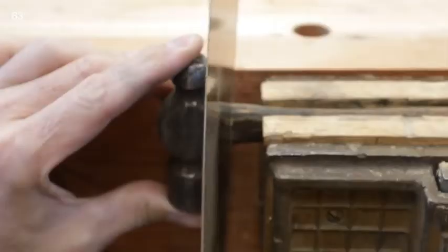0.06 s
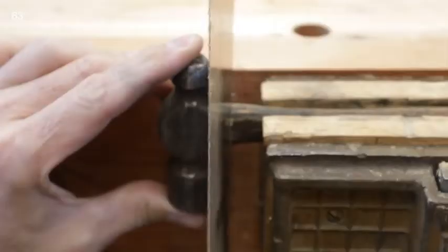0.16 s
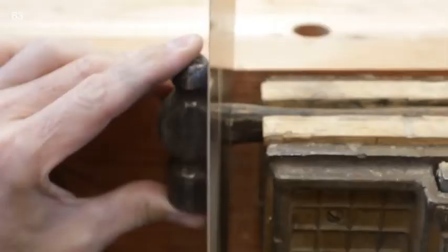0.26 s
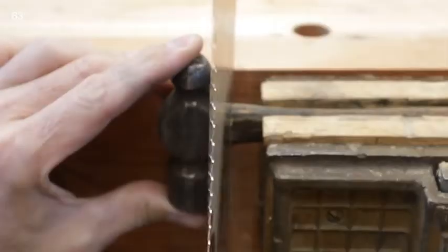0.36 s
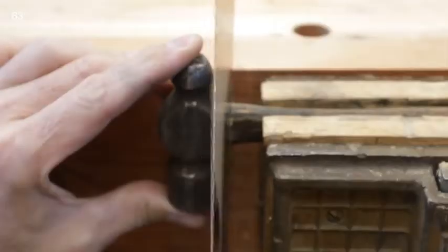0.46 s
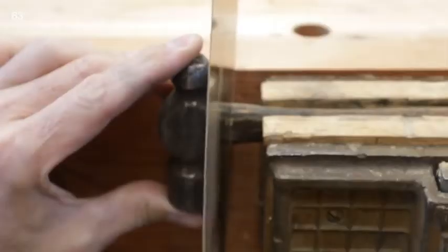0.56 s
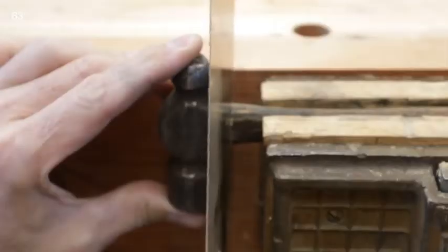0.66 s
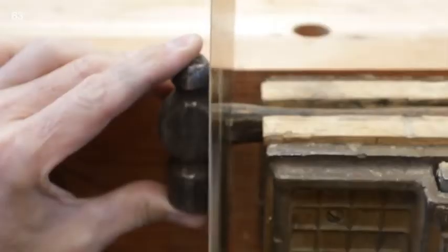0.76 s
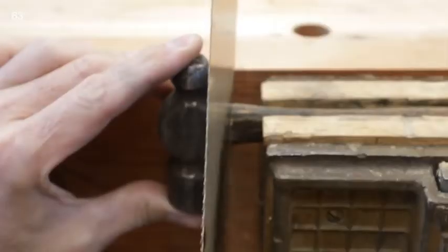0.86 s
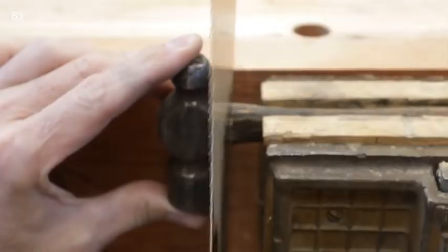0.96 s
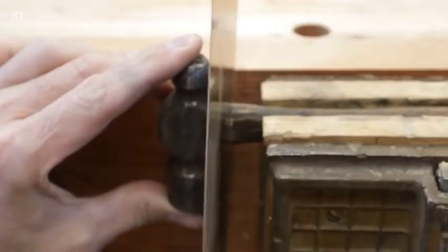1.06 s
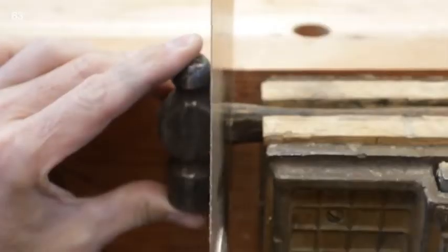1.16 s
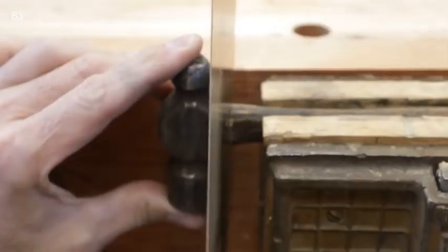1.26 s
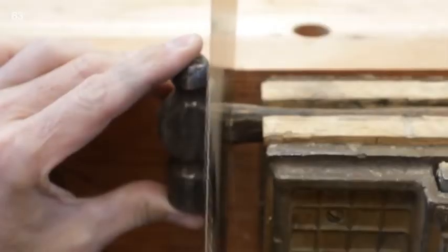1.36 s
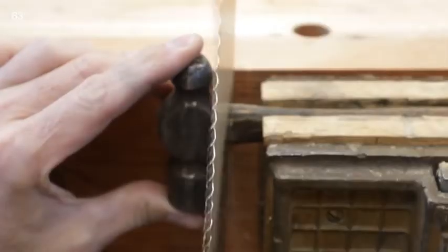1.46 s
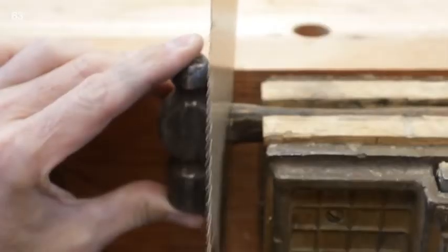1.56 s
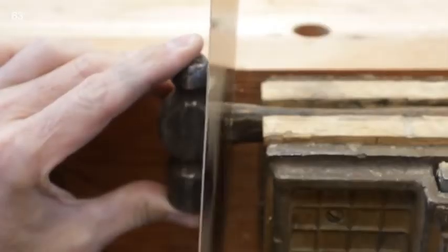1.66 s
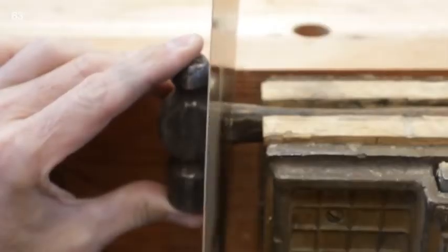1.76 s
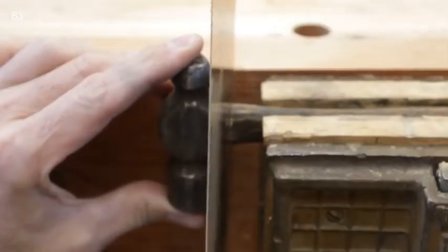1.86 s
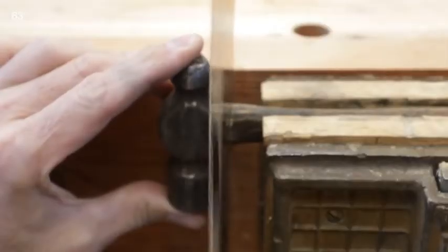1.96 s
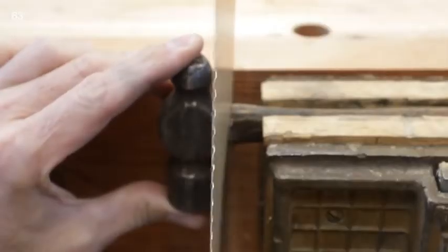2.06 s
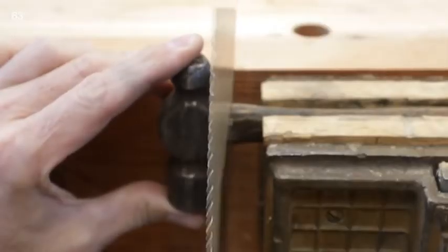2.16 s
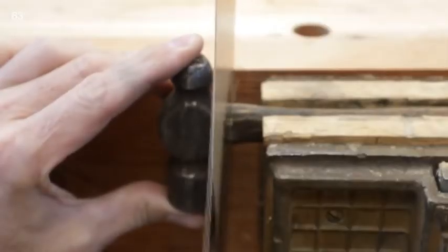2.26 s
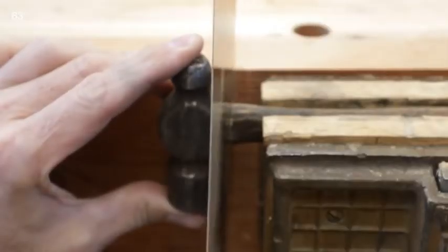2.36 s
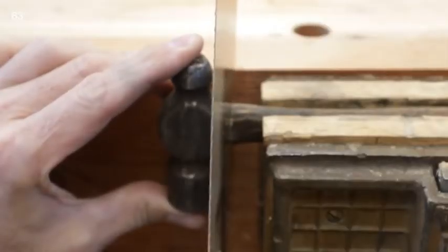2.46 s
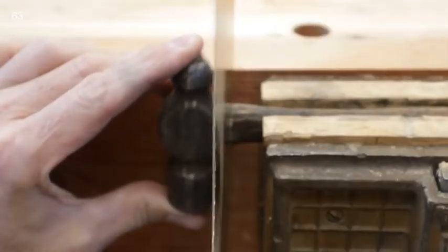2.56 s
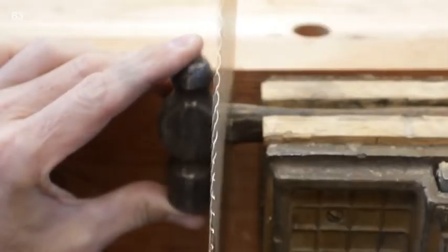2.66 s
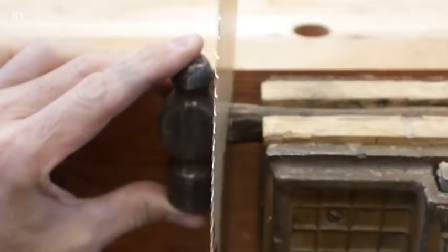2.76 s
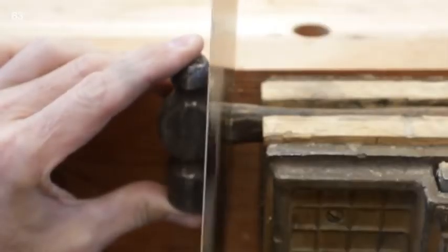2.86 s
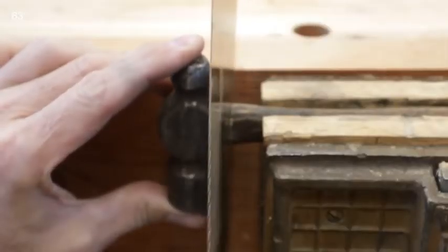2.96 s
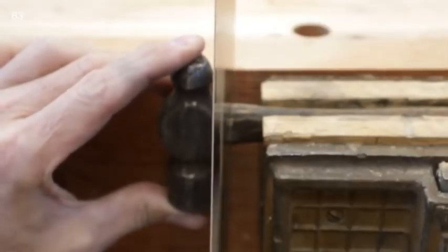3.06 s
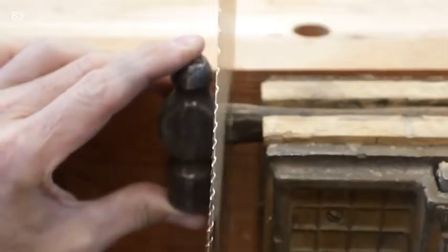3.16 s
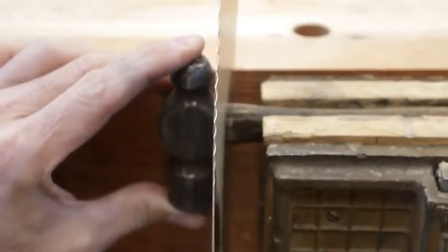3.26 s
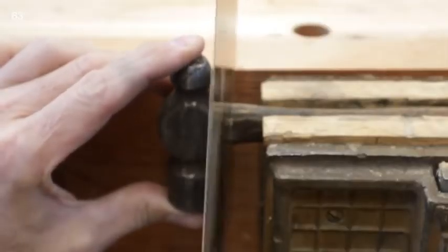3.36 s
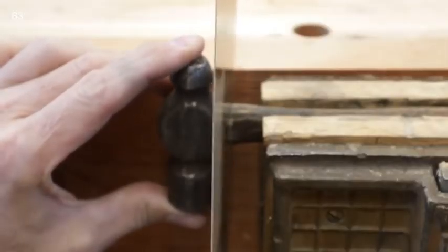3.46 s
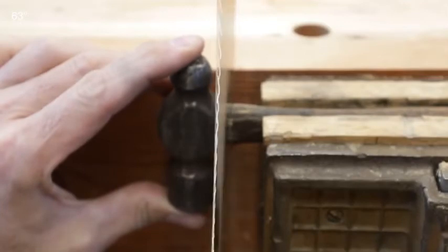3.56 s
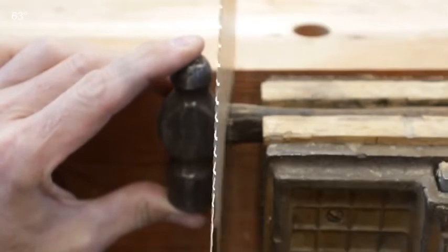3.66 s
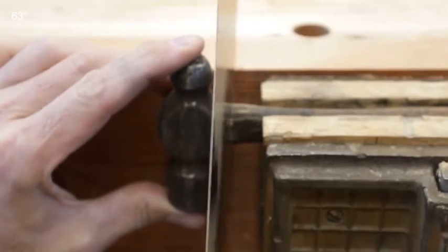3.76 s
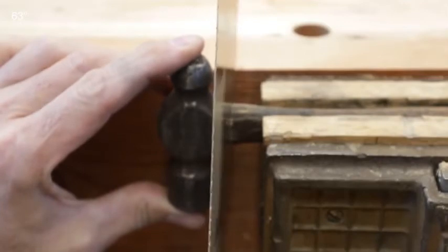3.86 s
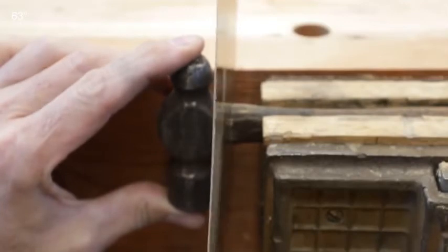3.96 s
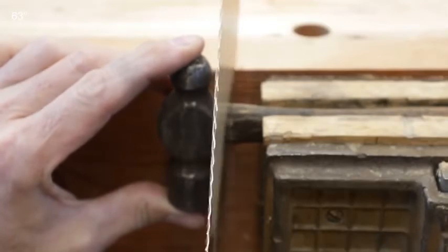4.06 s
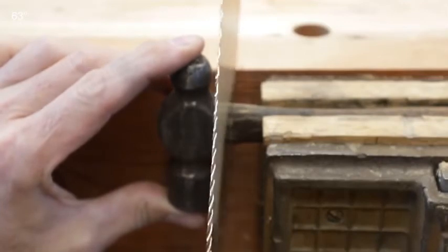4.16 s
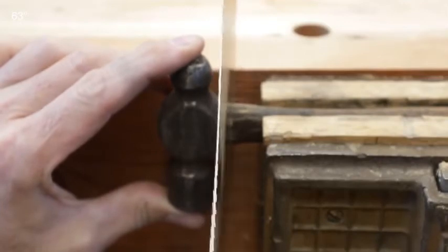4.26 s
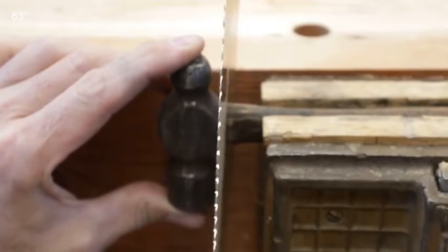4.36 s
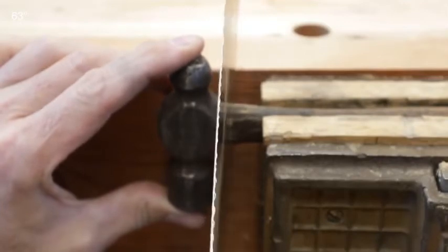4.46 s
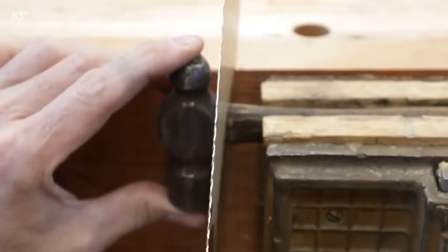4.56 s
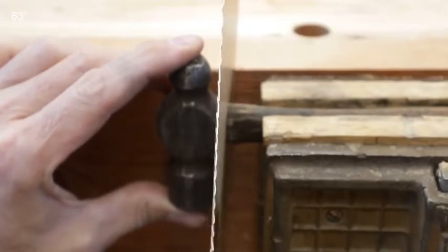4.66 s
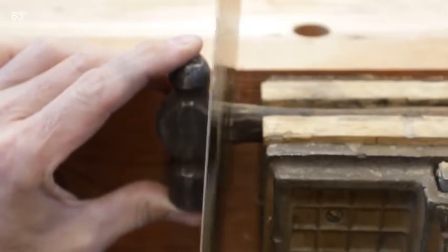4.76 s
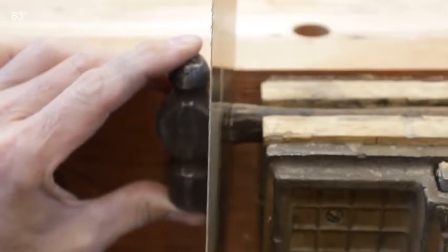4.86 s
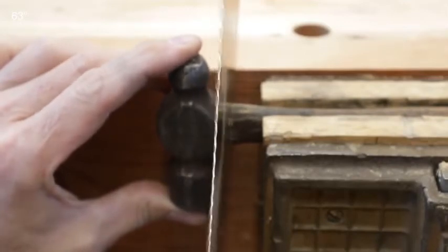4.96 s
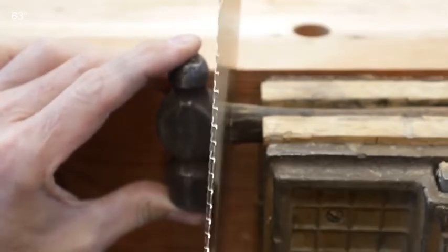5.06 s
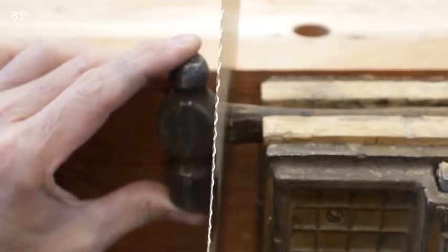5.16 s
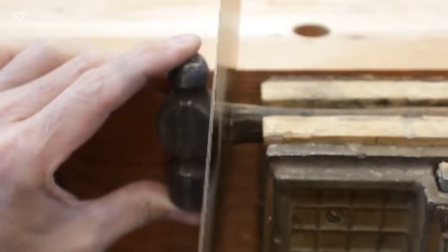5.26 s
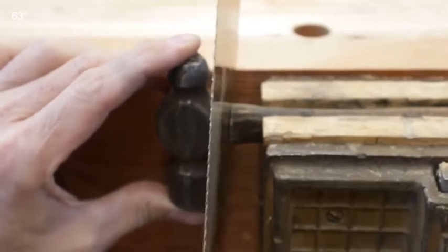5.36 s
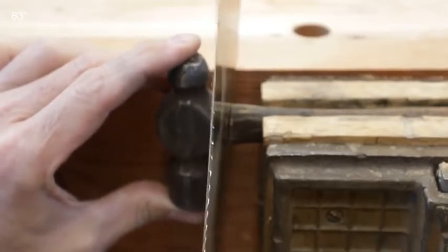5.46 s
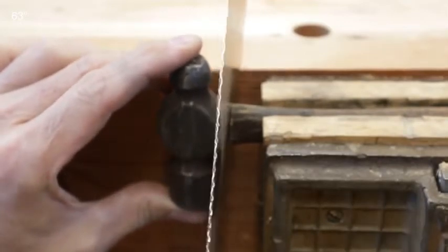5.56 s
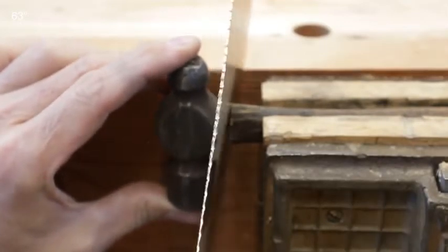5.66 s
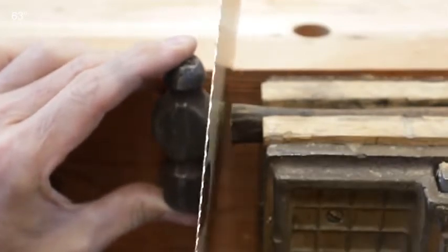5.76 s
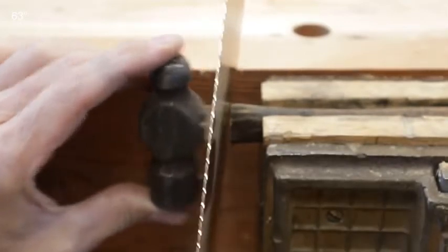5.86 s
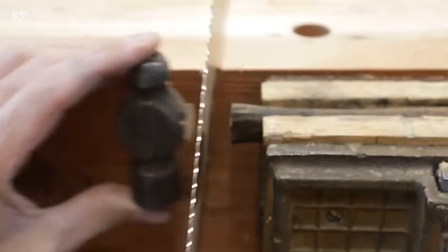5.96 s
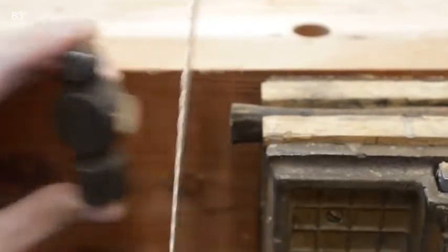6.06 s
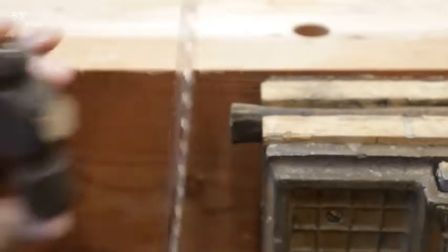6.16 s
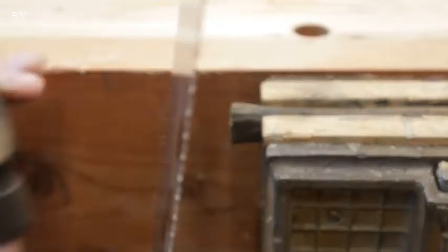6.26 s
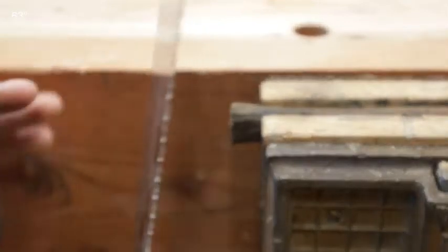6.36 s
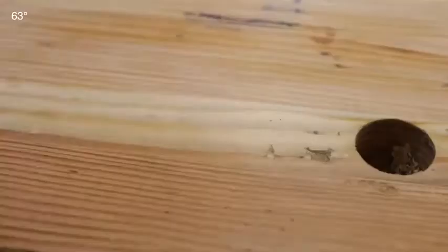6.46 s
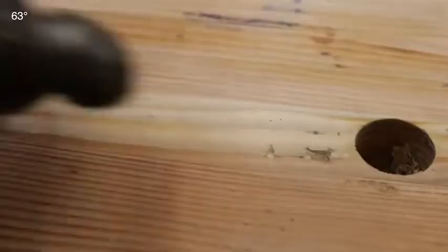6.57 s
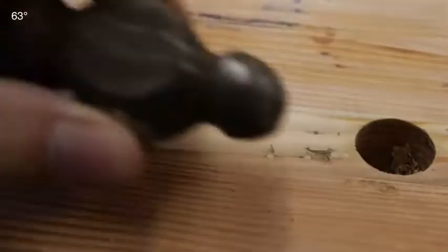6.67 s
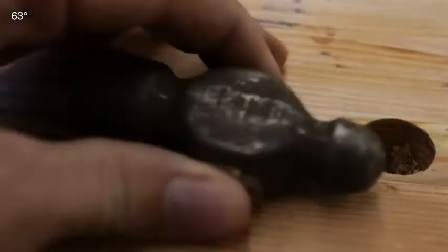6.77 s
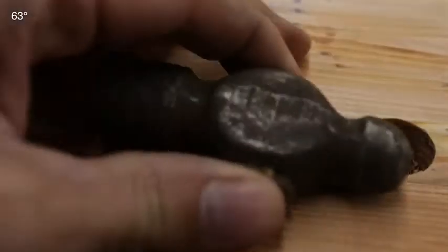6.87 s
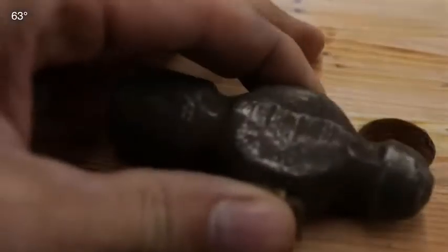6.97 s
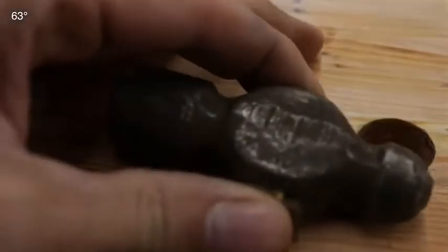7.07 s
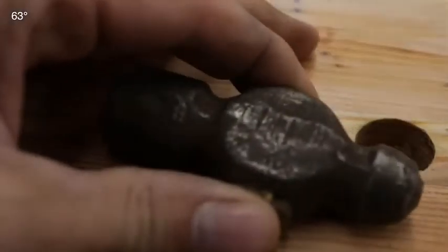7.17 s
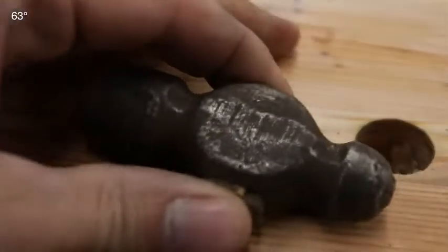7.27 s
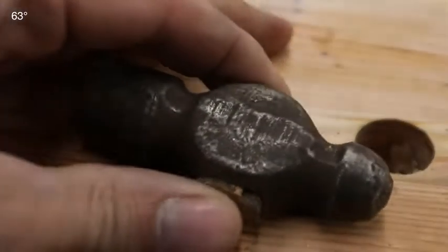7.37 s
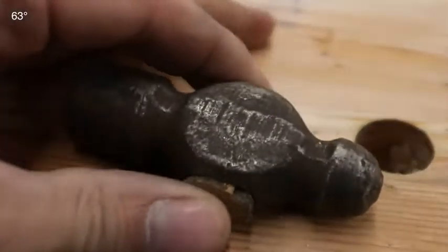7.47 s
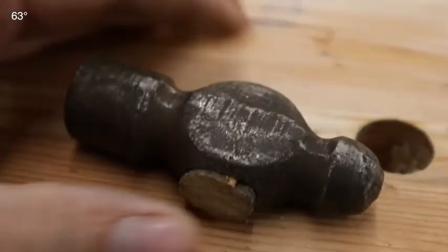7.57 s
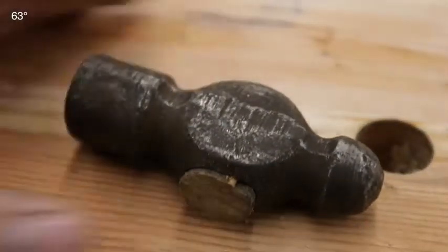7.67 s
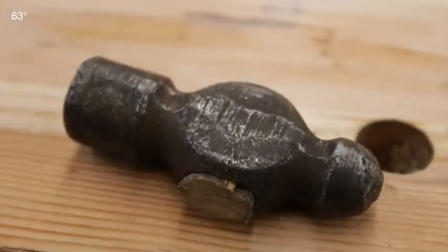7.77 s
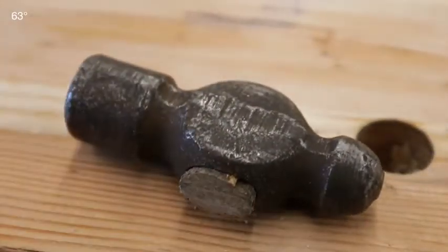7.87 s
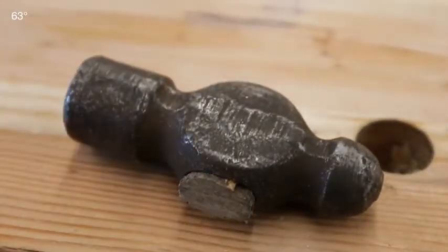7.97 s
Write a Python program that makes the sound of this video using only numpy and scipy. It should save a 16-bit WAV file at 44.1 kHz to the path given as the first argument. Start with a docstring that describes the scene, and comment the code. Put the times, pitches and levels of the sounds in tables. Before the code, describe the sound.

A handsaw rasps through a wooden handle in quick alternating strokes, breaks free with a faint steely ring, then a metal head knocks onto a bench.

```python
"""Handsaw through a wooden handle

A handsaw cuts a wooden handle held in a bench vice, with loud push and softer pull strokes. Tearing fibres, a
random impulse train, excite the blade, the thinning handle and the vice as resonators. The blade rings out when
it breaks through. Then, quieter, the steel head is set down on the bench top, exciting its many modes, and the
hand slides off it with a rustle of filtered grains."""
import sys
import numpy as np
from scipy import signal
from scipy.fft import rfft, irfft
from scipy.io import wavfile
from scipy.ndimage import uniform_filter1d

SR = 44100
rng = np.random.default_rng(int(sys.argv[2]) if len(sys.argv) > 2 else 0)


def int16_out(signal):
    """Quantize to a 16-bit WAV file."""
    q = np.round(np.clip(np.atleast_2d(signal).T, -1, 1) * 32767)
    wavfile.write(sys.argv[1], SR, q.astype(np.int16))


def gain_from_db(level_db):
    """Turn a decibel level (scalar or array-like) into a linear amplitude factor."""
    decades = np.asarray(level_db, float) / 20
    return 10 ** decades


N = 353241

# strokes, push and pull in turn, each ending where the next starts: (start [s], rasp level [dB],
# share of the stroke at top speed [0-1], handle re rasp [dB], vice re rasp [dB])
STROKES = [(-0.18, -37.5, 0.55, 4, 8), (0.061, -42.5, 0.42, 0.6, 1.5), (0.289, -37.5, 0.55, 3, -2.5),
           (0.537, -41, 0.38, 1.2, 1), (0.79, -37, 0.43, 4, -3), (1.054, -38.5, .45, -2.2, 0.5),
           (1.317, -38.5, 0.48, 3.5, 3), (1.685, -40, 0.39, -1.9, -3.5), (1.956, -36.5, 0.56, 5, 1.5),
           (2.273, -40.5, 0.53, 2, 0.3), (2.576, -37, 0.49, 2.4, 0.9), (2.878, -43, 0.38, 0, -8),
           (3.127, -38, 0.56, 4, -1), (3.349, -43, 0.44, 2.5, 1), (3.576, -35.5, .55, 4.5, -3.5),
           (3.798, -42.5, 0.42, 3, -0.7), (4.036, -40, .52, 9, 4), (4.277, -44.5, 0.48, 5.5, 0),
           (4.512, -40, 0.58, 8, 5), (4.754, -43.5, 0.44, 1, -3), (4.987, -43.5, 0.5, 4.5, 3),
           (5.276, -44, 0.5, 0, 3), (5.51, -40, 0.57, 3, -2.5), (5.725, -44.5, 0.11, 3.5, 2.2)]
# growth of the rasp as a power of speed, a row each for push and pull: (speeding up [1], slowing down [1])
SPEED_POWER = [(1.5, 1.83), (1.9, 1.53)]
# rasp at the turn re the peak of the stroke, one entry each for push and pull: (level [dB])
TURN_DB = [-19.5, -19.5]
# spectrum of the rasp: (frequency [Hz], density [dB per Hz])
RASP = [(880, -36), (1500, 1.5), (1850, -18), (1990, 3), (2260, -1.5), (2800, 2.5), (3230, 3.5),
        (4640, -10.5), (5660, -4), (6710, -14), (11600, -17.5), (13500, -18.5), (14500, -41)]
# relative loudness of the blade modes in the cut: (frequency [Hz], level [dB])
KERF = [(1410, -30.5), (2400, 2.5), (3320, -1), (5900, -8.5), (6890, -10.5), (14000, -14.5)]
# modes of the free blade: (frequency [Hz], relative level [dB], ring time T60 [s])
BLADE = [(624, -8, .7), (834, -20, 1.2), (1001, -24, 1.3), (1249, -10, .8), (1712, -15, .9),
         (1825, -23, .78), (2466, -22, .5), (2552, -6, .3), (2837, -24, 2.0), (3095, -2, .6),
         (3348, -11, 1.0), (3580, -12, .6), (4021, -20, 1.6), (4511, -18, 1.1), (4893, -19, .4),
         (5055, -23, .73), (5200, -13, .35), (5512, -27, .93), (5798, -9, .8), (6702, -23, .54),
         (7031, -34, 1.5), (7817, -17, .55), (8538, -19, .63), (8893, -24, .77), (9227, -25, .71),
         (10360, -25, .41), (10510, -27, .47)]
# resonance of the thinning handle at mid stroke: (time [s], frequency [Hz])
NECK = [(0.0, 1080), (0.5, 1280), (1.2, 1110), (2.2, 1170), (3.3, 1170), (4.3, 1114), (5.1, 1032),
        (5.4, 980), (5.6, 844), (5.86, 840)]
# rings of the handle and jaws: (frequency [Hz], relative level [dB])
WOOD = [(1087, -51), (1297, -49), (1475, -56), (1615, -55), (1744, -56), (1981, -57), (2363, -61)]
# rings of the vice and bench: (frequency [Hz], relative level [dB])
VICE = [(129.2, -63), (296.1, -48.5), (446.8, -50), (506.0, -51)]
# hum of the vice on the pull: (frequency [Hz], level re rasp [dB], ring time T60 [s])
HUM_HZ, HUM_DB, HUM_T60_S = (361, -14, 0.078)
# colour of the blade on the pull: (frequency [Hz], width [Hz], level re rasp [dB])
SHEEN_HZ, SHEEN_WIDTH_HZ, SHEEN_DB = (3000, 270, -16)
# teeth that catch: (time [s], relative level [dB], frequency [Hz])
CATCHES = [(0.393, -15.5, 1760), (0.421, -28, 1500), (0.446, -19.5, 1290), (0.563, -27, 1030),
           (0.614, -28.5, 1190), (0.811, -26.5, 635), (1.136, -18, 1110), (1.381, -21.5, 620),
           (1.424, -9.5, 1970), (1.482, -11.5, 1260), (1.526, -14, 1270), (2.051, -31.5, 978),
           (2.066, -30, 1270), (2.5, -23.5, 1080), (2.631, -18.5, 800), (2.977, -20, 1330),
           (3.006, -23, 1030), (3.166, -20.5, 1120), (3.18, -20, 1085), (3.225, -17.5, 1106),
           (3.253, -13, 1090), (3.284, -23.5, 780), (3.392, -33.5, 1100), (3.605, -22, 1092),
           (3.64, -13.5, 1076), (3.692, -15, 1230), (3.958, -19.5, 1100), (4.057, -23, 974),
           (4.079, -17.5, 966), (4.1, -14, 1260), (4.123, -11.5, 1300), (4.141, -13, 1280),
           (4.163, -29, 1100), (4.189, -15.5, 1270), (4.204, -14, 1270), (4.322, -23, 993),
           (4.347, -23.5, 1070), (4.387, -18, 1040), (4.577, -16.5, 986), (4.595, -23, 1270),
           (4.621, -16, 1240), (4.651, -10, 873), (4.823, -26, 1020), (4.839, -17.5, 1266),
           (4.872, -22, 1106), (4.927, -20.5, 1066), (5.032, -20.5, 990), (5.059, -17, 1260),
           (5.077, -16.5, 1250), (5.121, -22, 1265), (5.134, -16.5, 1090), (5.163, -16.5, 910),
           (5.182, -16.5, 1180), (5.204, -16.5, 990), (5.34, -17.5, 980), (5.413, -14, 986),
           (5.441, -17, 956), (5.55, -22.5, 858), (5.583, -10.5, 853), (5.609, -16, 770),
           (5.635, -15.5, 797), (5.658, -11.5, 807), (5.73, -15.5, 813)]
# one blade mode sings out of the rasp: (time [s], level [dB], frequency [Hz], ring time T60 [s])
SINGS = [(.05, -51, 5200, .25), (.55, -46, 3095, .3), (.74, -46, 3095, .3), (1.0, -52, 9227, .3),
         (1.03, -46, 3095, .3), (1.3, -51, 5200, .2), (1.607, -38, 3095, .5), (1.72, -38, 3000, .15),
         (2.12, -38, 5512, .1), (2.197, -33, 3095, .12), (2.24, -46, 5798, .3), (3.76, -45, 4021, .3),
         (3.86, -38, 3348, .15), (3.97, -42, 3020, .25), (4.066, -36, 2956, .12), (4.62, -32, 3225, .15),
         (5.635, -34, 2837, .14), (5.67, -42, 6410, .2), (5.75, -56, 5798, .6), (5.77, -56, 4021, .5),
         (5.97, -52, 830, .15)]
# brushes of the freed blade, the first sets it ringing: (time [s], relative level [dB], top of the tick [Hz])
BRUSHES = [(5.864, -41.5, 12050), (5.961, -54.5, 9000), (6.264, -46, 5500)]
# sideways whips of the blade: (widest at [s], level [dB], frequency [Hz], 30 dB rise [s], 30 dB fall [s])
FLEX = [(0.03, -42, 60.1, 0.72, .3), (0.51, -37, 73.7, .25, .28), (0.9, -36, 72.5, 0.14, .14),
        (1.09, -45, 69, 0.07, .16), (1.41, -42.5, 65.3, 0.15, .3), (1.535, -36.5, 71.7, 0.086, .04),
        (1.65, -37, 74.6, 0.16, .27), (2.135, -29.5, 65.6, .15, .08), (2.28, -44, 75.4, 0.27, .14),
        (2.73, -27, 72.3, 0.14, .33), (3.29, -33, 71, 0.13, .27), (3.7, -35, 68.6, 0.1, .23),
        (4.225, -39.5, 67, 0.096, .08), (4.35, -54.5, 77.5, .15, .3), (4.595, -48, 71, .1, .1),
        (4.69, -39, 66.7, .08, .26), (5.1, -51.5, 82.7, 0.18, .17), (5.66, -52.5, 75.5, 0.29, .45)]
# rumbles of the bench: (strongest at [s], level [dB], 30 dB rise [s], 30 dB fall [s])
RUMBLE = [(0.03, -37.5, .25, 0.23), (0.62, -63.5, .45, .15), (0.92, -60, .22, .2), (1.07, -51, .2, .25),
          (1.49, -43.5, .28, .3), (2.13, -55.5, .35, .2), (2.34, -63, .15, 0.22), (2.8, -75, .5, .5),
          (3.33, -58.5, .4, .45), (3.7, -64.5, .4, .6), (4.22, -47, .28, .3), (4.66, -49, .25, 0.53),
          (5.12, -43.5, .1, 0.38), (5.68, -51, .17, 0.58), (6.93, -71, .1, 0.97)]
# touches of the steel head on the bench top: (time [s], relative level [dB], hardness [0-1])
KNOCKS = [(6.749, -67, 0.43), (6.872, -32.5, 0.22), (6.901, -25, 1), (6.92, -32, 0.55),
          (6.946, -24.5, 0.65)]
# head rocked and nudged: (strongest at [s], relative level [dB], 30 dB rise [s], 30 dB fall [s])
NUDGE = [(7.125, -61.5, .02, 0.18), (7.4, -66.5, 0.61, 0.084), (7.482, -67.5, .1, .04),
         (7.55, -70, .1, 0.073), (7.63, -78, 0.26, 0.13)]
# relative loudness of the bench-top modes: (frequency [Hz], level [dB])
BENCH = [(47, -55), (80, -34.5), (112, -33.5), (291, -13), (351, -9), (456, -4.5), (581, -16.5), (1000, -8),
         (1180, -3), (1280, -1), (1570, -12.5), (2070, -18.5), (2460, -34), (3400, -23), (4000, -30),
         (7000, -65), (9100, -93), (15400, -120)]
# damping of the bench-top modes: (frequency [Hz], ring time T60 [s])
BENCH_T60 = [(150, 0.98), (400, 0.57), (1040, 0.27), (2760, 0.16)]
# the one bench-top mode that rings on: (frequency [Hz], level over its neighbours [dB], ring time T60 [s])
BENCH_BOOM = (346, 6.3, 0.7)
# saw drawn away, later fingers sliding off the steel, one list a move: (time [s], treble level [dB])
RUSTLE = [
    [(5.83, -52), (5.87, -58), (5.97, -66), (6.02, -73), (6.19, -72.5), (6.45, -63), (6.556, -67.5),
     (6.62, -91)],
    [(7.61, -95), (7.684, -72.5), (7.826, -70.5), (7.9, -79.5), (8.01, -81)],
]
# treble spectrum, one list a move: (frequency [Hz], density [dB per Hz])
RUSTLE_TREBLE = [
    [(880, -18), (1500, -6.5), (1570, -7), (1880, -3.5), (2600, -10), (3100, -4), (3410, -14), (4390, -10),
     (4780, -16), (6040, -16), (7350, -21.5), (9450, -19.5), (14000, -24.5)],
    [(1060, -45.5), (1800, -1.5), (4100, 1.5), (4470, 2), (6810, -4.5), (9510, -0.5), (14000, -3)],
]
# dull part of each move: (level at mean treble level [dB], share of the treble swing it follows [0-1])
RUSTLE_LOW = [(-65, 0.52), (-88.5, 0.51)]
# spectrum of the air: (frequency [Hz], density [dB per Hz])
AIR = [(15, -27), (25, 3), (378, 0.5), (2310, -12), (2500, -10.5), (4030, -13.5), (4860, -13.5),
       (5700, -14), (6340, -17.5), (7440, -14), (11100, -16), (12000, -16.5), (14500, -20)]
# thin steady tone: (frequency [Hz], level [dB])
WHINE = [(11999, -90.5)]


def saw():
    """Common excitation: the same tearing drives rasp, blade, handle and vice as parallel resonators."""
    speed, stroke, done, pull, handle_db, vice_db = arm()
    # handle and vice stand out more towards the turn
    handle_db = handle_db + (1 - speed)
    vice_db = vice_db + 4.5 * (1 - speed)
    # the pitch of the neck climbs by 12 % along each stroke
    neck_hz = in_time(NECK)[0] * (1 + 0.12 * (done - 0.5))
    # as the cut deepens, the thinning neck honks more and the solid wood less
    depth_db = np.interp(np.arange(N) / SR, [1.5, 5.6], [-5, 5])

    teeth, bursts = tearing(per_s=4000.0, spread_db=1.12, clump_db=1.7, grabs_per_s=50.0)
    dust = rng.standard_normal(N) * bursts
    rasp = stroke * rms_one(colour(teeth + 0.8 * dust, RASP))
    # the treble is lifted, slightly more at low speed, and flares at each grab
    treble = zero_phase(rasp, 7000, "high")
    rasp = rasp + treble * (gain_from_db(5.74 - speed) * bursts ** 0.14 - 1)
    # the foot of the rasp is the solid wood too
    foot = zero_phase(rasp, 2400, "low")
    rasp = rasp + foot * (gain_from_db(3.3 - 0.7 * depth_db) - 1)

    steel_modes = [(hz, at_hz(KERF, hz)) for hz in spread_modes(2400, 13500, count=40)]
    main_modes = [(hz, at_hz(KERF, hz)) for hz, db, t60 in BLADE[8:]]
    blade = driven(lambda x: resonances(x, steel_modes, t60=0.08, patchy_db=8.0), teeth, stroke)
    # the main blade modes are damped less and sound on through the turn of the stroke
    singing = driven(lambda x: resonances(x, main_modes, t60=0.3, patchy_db=5.0), teeth, stroke)
    sheen_level = stroke * pull * gain_from_db(SHEEN_DB + 0.6 * depth_db)
    sheen = driven(lambda x: gliding(x, np.full(N, SHEEN_HZ), SHEEN_WIDTH_HZ), teeth, sheen_level)

    # the neck honks more on the pull
    neck_level = stroke * gain_from_db(handle_db + depth_db + 5 * pull)
    neck = driven(lambda x: gliding(x, neck_hz, width_hz=190.0), teeth, neck_level)
    wood_level = stroke * gain_from_db(handle_db - depth_db)
    wood = driven(lambda x: resonances(x, WOOD, t60=0.11, patchy_db=5.5), teeth, wood_level)
    dull = driven(lambda x: band(x, 610.0, 2300.0), teeth, wood_level * gain_from_db(-2.5 * pull))

    vice_level = stroke * gain_from_db(vice_db)
    vice = driven(lambda x: resonances(x, VICE, t60=0.22, patchy_db=1.0), teeth, vice_level)
    thrum = driven(lambda x: band(x, 213.0, 650.0), dust, vice_level)
    # the vice hums on the pull while the cut is shallow
    hum_level = stroke * pull * gain_from_db(HUM_DB - 1.8 * depth_db)
    hum = driven(lambda x: ring(x, HUM_HZ, HUM_T60_S), dust, hum_level)

    steel = gain_from_db(-6) * blade + gain_from_db(-9) * singing + sheen
    handle = gain_from_db(-3.5) * neck + gain_from_db(-8.0) * wood + gain_from_db(-4.0) * dull
    return rasp + steel + handle + gain_from_db(-3.5) * vice + gain_from_db(-2.5) * thrum + hum


def arm():
    """Reciprocating motion: warped half-sine speed, rasp gain as its power; handle and vice levels blend."""
    through_s = 5.83  # the last stroke ends
    t = np.arange(N) / SR
    s, peak_db, fastest, handle_db, vice_db = np.transpose(STROKES)
    lengths = np.append(s[1:], through_s) - s
    k = np.searchsorted(s, t, "right") - 1
    done = np.clip((t - s[k]) / lengths[k], 0, 1)
    # warp the phase so that the top speed falls at its share of the stroke
    turned = done ** (np.log(0.5) / np.log(np.clip(fastest[k], 0.1, 0.9)))
    speed = np.sin(np.pi * turned)
    slowing = (turned > 0.5).astype(int)
    creep = gain_from_db(np.array(TURN_DB)[(k + slowing) % 2])
    pull = np.arange(len(s)) % 2 * 1.0
    # blend across the turns
    columns = (peak_db, pull, handle_db, vice_db)
    peak_db, pull, handle_db, vice_db = [uniform_filter1d(c[k], size=1800) for c in columns]
    # the pressure of the hand wavers
    peak_db = peak_db + 0.88 * drift(8.8)
    growth = np.abs(speed) ** np.array(SPEED_POWER)[k % 2, slowing]
    stroke = gain_from_db(peak_db) * (creep + (1 - creep) * growth) * (t < through_s)
    return speed, stroke, done, pull, handle_db, vice_db


def catches():
    """Stick-slip release: a caught tooth lets go as a wooden ring, crack and puff; at times the blade sings."""
    cycles = 23.8  # a catch rings this many cycles to -60 dB
    wooden = swell([(s, db, hz, cycles / hz) for s, db, hz in CATCHES], rise=0.057)
    song = swell(SINGS, rise=0.01)
    crack = gain_from_db(7) * band(blows(CATCHES, spread_db=1.5), 600.0, 2600.0)
    dust = puffs(CATCHES, spread_db=2.5, fade_s=0.0035)
    rasp = gain_from_db(-19.0) * colour(dust, RASP)
    hiss = gain_from_db(-31.5) * band(dust, 6000.0, 14000.0)
    return wooden + song + crack + rasp + hiss


def free_blade():
    """Free vibration: out of the kerf the steel modes ring long; each brush is a faint noise tick."""
    s, first_db, _ = BRUSHES[0]
    out = swell([(s, first_db + db - 6.0, hz, t60) for hz, db, t60 in BLADE], rise=0.017)
    for brush in BRUSHES:
        tick = puffs([brush], spread_db=1, fade_s=0.004)
        out = out + gain_from_db(-6.5) * band(tick, 1800.0, brush[2])
    return out


def flexing():
    """Bending vibration: the blade wobbles at its lowest pitch; wide swings add the octave by their square."""
    swing = humps(FLEX)
    phase = 2 * np.pi * np.cumsum(in_time(FLEX)[1]) / SR
    octave = gain_from_db(18.5) * swing ** 2 * np.sin(2 * phase)
    return np.sqrt(2) * swing * np.sin(phase) + octave


def rumble():
    """Low-frequency noise: the bench rumbles in a narrow band that swells and dies."""
    return humps(RUMBLE) * rms_one(band(rng.standard_normal(N), 36.0, 56.0))


def knocks():
    """Modal excitation: touches and faint rubbing ring the bench top; harder touches reach higher modes."""
    s, peak_db, hard = np.transpose(KNOCKS)
    grains = tearing(per_s=700.0, spread_db=2.0, clump_db=2.5, grabs_per_s=30.0)[0]
    rubbing = gain_from_db(-30.5) * humps(NUDGE) * grains
    out, start = np.zeros(N), round(s[0] * SR) - 1
    many = [*spread_modes(89.7, 2400, count=90), *spread_modes(3100, 6500, count=50)]
    modes = [BENCH_BOOM, *[(hz, 0, min(at_hz(BENCH_T60, hz), 0.36)) for hz in many]]
    for hz, extra_db, t60 in modes:
        octaves = np.log2(hz / 350)
        # soft contact lasts longer, so its spectrum falls with frequency
        tilt_db = -10 * (1 - np.clip(hard, 0, 1)) * octaves
        push = rng.choice([-1, 1]) * blows(np.column_stack([s, peak_db + tilt_db - 16.5]), spread_db=1.5)
        push = push + rubbing * gain_from_db(-13 * abs(octaves))
        out[start:] += gain_from_db(at_hz(BENCH, hz) + extra_db) * ring(push[start:], hz, t60)
    return band(out, 80.0, 7400.0)


def rustle():
    """Sliding friction: dense grains in a dull and a treble band, silent between the two moves."""
    out, t = 0, np.arange(N) / SR
    for move, treble, (dull_db, follows) in zip(RUSTLE, RUSTLE_TREBLE, RUSTLE_LOW):
        treble_db, = in_time(move)
        low_db = dull_db + follows * (treble_db - np.mean(move, axis=0)[1])
        grains = tearing(per_s=9000.0, spread_db=1.0, clump_db=0.4, grabs_per_s=36.0)[0]
        moving = (t > move[0][0]) & (t < move[-1][0])
        low = gain_from_db(low_db) * rms_one(band(grains, 110.0, 1420.0))
        high = gain_from_db(treble_db) * rms_one(colour(grains, treble))
        out = out + moving * (low + high)
    return out


def shop(x):
    """Reverberation: ten feedback delays, duller on every round."""
    t60_s, wall_cut_hz = 0.59, 2900
    out, dull = np.zeros(N), np.exp(-2 * np.pi * wall_cut_hz / SR)
    lags = (rng.uniform(0.012, 0.04, 10) * SR).astype(int)
    for k, lag in enumerate(lags):
        loop, gain, state = x.copy(), gain_from_db(-60 * lag / SR / t60_s), [0.0]
        for i in range(lag, N, lag):
            back, state = signal.lfilter([gain * (1 - dull)], [1, -dull], loop[i - lag:i], zi=state)
            loop[i:i + lag] += back[:N - i]
        # only the echoes are kept, with alternating sign
        out += (loop - x) * (-1) ** k
    return out


def air():
    """Stationary noise: Gaussian noise shaped to the spectrum of the air."""
    return gain_from_db(-73) * rms_one(colour(rng.standard_normal(N), AIR))


def whine():
    """Pure tone: a steady sine at the given rms level."""
    t = np.arange(N) / SR
    return sum(np.sqrt(2) * gain_from_db(db) * np.sin(2 * np.pi * hz * t) for hz, db in WHINE)


def tearing(per_s, spread_db, clump_db, grabs_per_s):
    """Poisson impulses: fibres snap at random; each grab starts a burst that dies away; both at rms 1."""
    sizes = gain_from_db(spread_db * np.minimum(rng.exponential(1, N), 5)) * rng.choice([-1, 1], N)
    grabs = (rng.random(N) < grabs_per_s / SR) * rng.exponential(1, N)
    bursts = 4.5 + clump_db * fading(grabs, 0.0071)
    snaps = rng.random(N) < per_s / SR
    return rms_one(sizes * snaps * bursts), rms_one(bursts)


def blows(events, spread_db):
    """Impulsive force: one click per row, its strength scattered a little."""
    clicks = np.zeros(N)
    at = [round(row[0] * SR) for row in events]
    clicks[at] = gain_from_db(np.array(events)[:, 1] + spread_db * rng.standard_normal(len(events)))
    return clicks


def puffs(events, spread_db, fade_s):
    """Transient noise: each blow lets out noise that fades exponentially."""
    return fading(blows(events, spread_db), fade_s) * rng.standard_normal(N)


def fading(clicks, fade_s):
    """Exponential relaxation: each click decays with this time constant."""
    return signal.lfilter([1], [1, -np.exp(-1 / (fade_s * SR))], clicks)


def driven(body, force, level):
    """Forced vibration: the force at this level drives a body, whose rings outlast it; rms is kept."""
    return rms_one(body(force * level)) * np.sqrt(np.mean(level ** 2))


def ring(clicks, hz, t60):
    """Damped oscillator: a unit click sets a sine of height about 1 ringing."""
    r, w = gain_from_db(-60 / (t60 * SR)), 2 * np.pi * hz / SR
    return signal.lfilter([0, np.sin(w)], [1, -2 * r * np.cos(w), r * r], clicks + 1e-18)


def resonances(x, lines, t60, patchy_db):
    """Modal superposition: parallel rings, each driven now more, now less, as the contact shifts."""
    loudest = max(db for hz, db in lines)
    out = 0
    for hz, db in lines:
        contact = gain_from_db(patchy_db * np.minimum(drift(7.6), 1.3))
        out = out + gain_from_db(db - loudest) * ring(x * contact, hz, t60)
    return out


def gliding(x, hz, width_hz):
    """Time-varying resonance: one resonator whose centre moves, block by block."""
    out, state, r = np.zeros(N), np.zeros(2), np.exp(-np.pi * width_hz / SR)
    for i in range(0, N, 256):
        poles = [1, -2 * r * np.cos(2 * np.pi * hz[i] / SR), r * r]
        out[i:i + 256], state = signal.lfilter([1, 0, -1], poles, x[i:i + 256], zi=state)
    return out


def swell(events, rise):
    """Damped sine: one ring a row at its own pitch, swelling in over a small share of its ring time."""
    out, t = np.zeros(N + SR), np.arange(SR) / SR
    for s, db, hz, t60 in events:
        at = round(s * SR)
        envelope = gain_from_db(db - 60 * t / t60) * (1 - np.exp(-t / (rise * t60)))
        out[at:at + SR] += envelope * np.sin(2 * np.pi * hz * t)
    return out[:N]


def humps(rows):
    """Energy summation: a gain that swells to each row's peak and dies away, overlaps adding in power."""
    t, power = np.arange(0, N + 64, 64) / SR, 0
    for s, db, *rest in rows:
        share = np.abs(t - s) / np.where(t < s, rest[-2], rest[-1])
        power = power + gain_from_db(db - 30 * share ** 1.11) ** 2
    return np.interp(np.arange(N) / SR, t, np.sqrt(power))


def drift(rate):
    """Low-pass random process: slow chance of rms 1, drawn at every 32nd sample; rate in Hz."""
    r = np.exp(-64 * np.pi * rate / SR)
    slow = signal.lfilter([1], [1, -2 * r, r * r], rng.standard_normal(N // 32 + 2002))[2000:]
    return np.interp(np.arange(N) / 32, np.arange(len(slow)), rms_one(slow))


def colour(x, spectrum):
    """Minimum-phase filtering: the given spectrum is imposed causally, so no click sounds early."""
    hz = np.maximum(np.arange(2049) * SR / 4096, 10)
    cepstrum = irfft(at_hz(spectrum, hz) * np.log(10) / 20)
    # fold the cepstrum onto positive time
    cepstrum[1:2048] *= 2
    cepstrum[2049:] = 0
    return signal.fftconvolve(x, irfft(np.exp(rfft(cepstrum))))[:N]


def band(x, low_hz, high_hz):
    """Band-pass filtering: a causal Butterworth band."""
    sos = signal.butter(2, [low_hz, min(high_hz, 0.45 * SR)], "band", fs=SR, output="sos")
    return signal.sosfilt(sos, x)


def zero_phase(x, cut_hz, kind):
    """Zero-phase filtering: forward and backward, so that the part stays in step with the whole."""
    return signal.sosfiltfilt(signal.butter(3, cut_hz, kind, fs=SR, output="sos"), x)


def spread_modes(low_hz, high_hz, count):
    """Modal density: uneven pitches, about evenly dense."""
    jitter = rng.uniform(-0.5, 0.5, count)
    return np.linspace(low_hz, high_hz, count) + (high_hz - low_hz) / count * jitter


def at_hz(points, hz):
    """Logarithmic frequency: interpolates a spectrum evenly per octave."""
    return np.interp(np.log(hz), np.log(np.array(points)[:, 0]), np.array(points)[:, 1])


def in_time(rows):
    """Linear interpolation: each column after the first, followed through time."""
    s, *columns = np.transpose(rows)
    return [np.interp(np.arange(N) / SR, s, c) for c in columns]


def rms_one(x):
    """Normalisation: scales a signal to an rms of 1."""
    return x / np.sqrt(np.mean(x ** 2) + 1e-20)


def scene():
    """Superposition: direct sounds, reverberation of the cut and the knocks, and background add linearly."""
    near = saw() + catches() + knocks()
    echoes = gain_from_db(-19) * shop(near)
    mix = near + echoes + free_blade() + flexing() + rumble() + rustle() + air() + whine()
    return mix[None]


def low_pass(x):
    """Removes everything above the highest recorded frequency."""
    return signal.sosfilt(signal.butter(12, 14620, fs=SR, output="sos"), x)


def record(dry):
    """Unity gain: the finished mix goes to the output at its own level."""
    return low_pass(dry)


dry = scene()
out = record(dry)
int16_out(out)
```